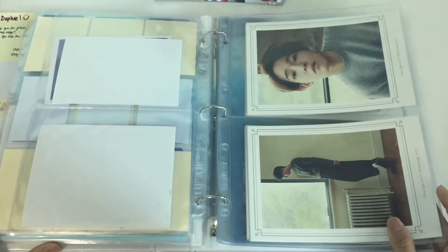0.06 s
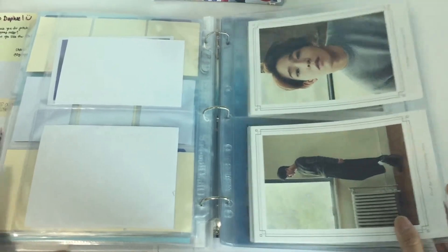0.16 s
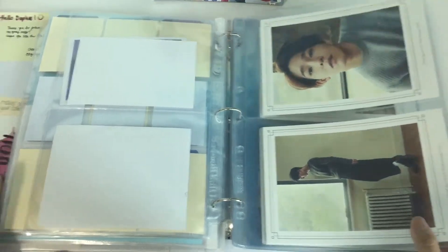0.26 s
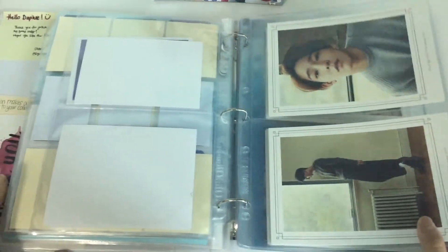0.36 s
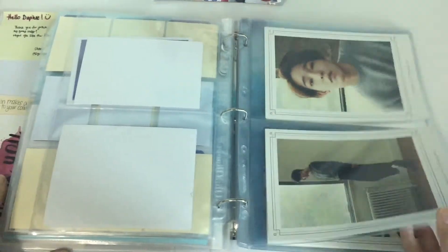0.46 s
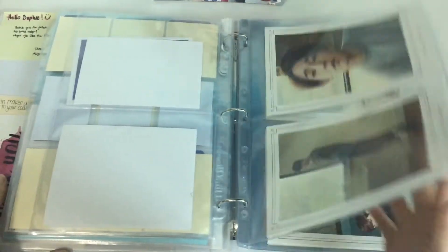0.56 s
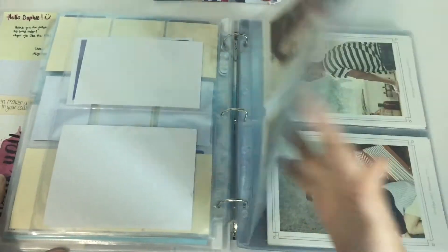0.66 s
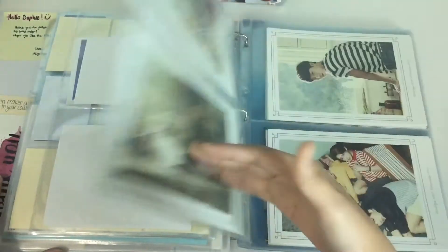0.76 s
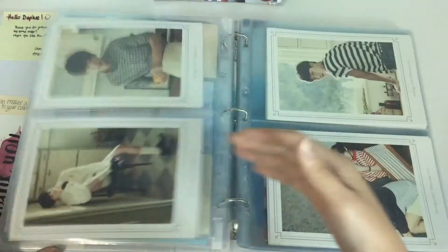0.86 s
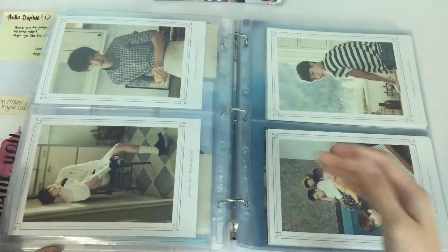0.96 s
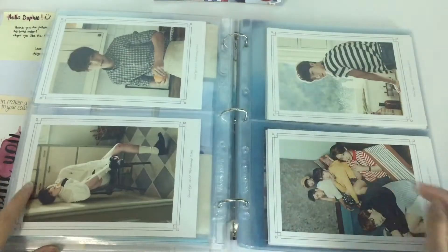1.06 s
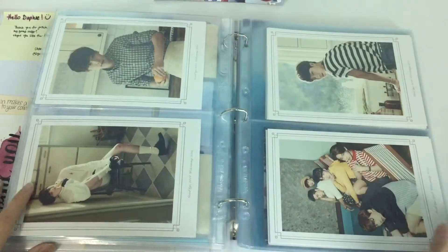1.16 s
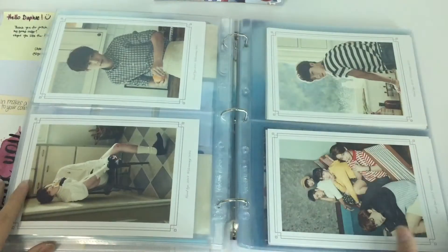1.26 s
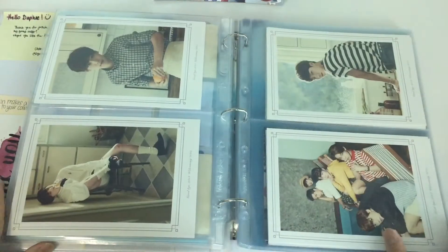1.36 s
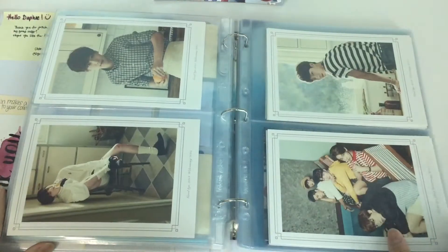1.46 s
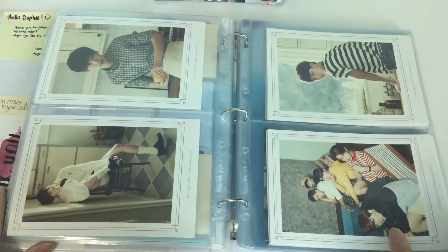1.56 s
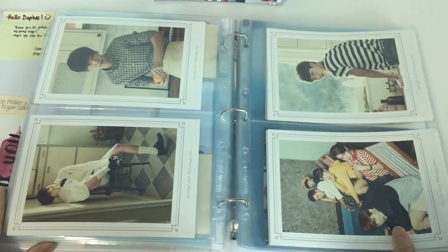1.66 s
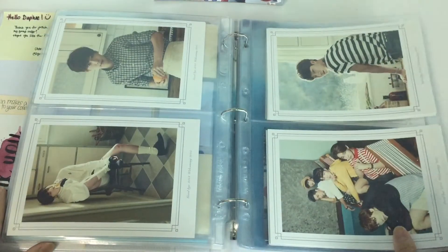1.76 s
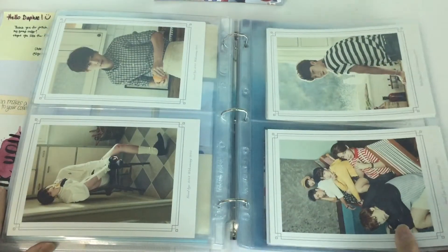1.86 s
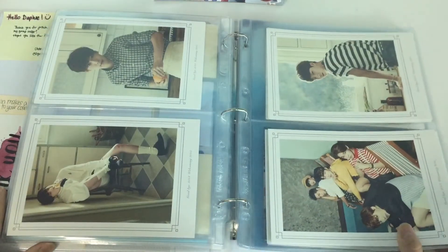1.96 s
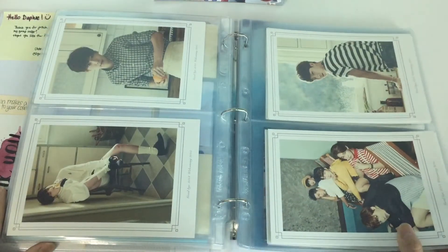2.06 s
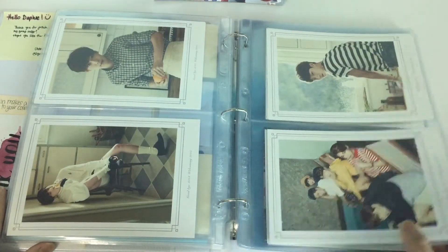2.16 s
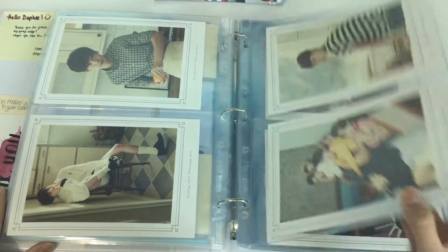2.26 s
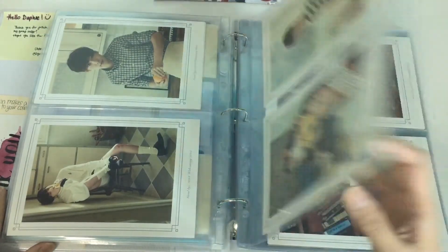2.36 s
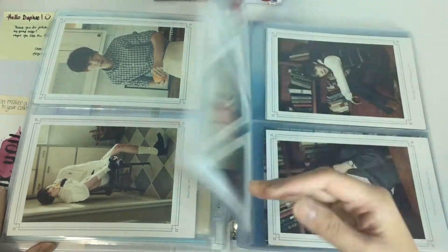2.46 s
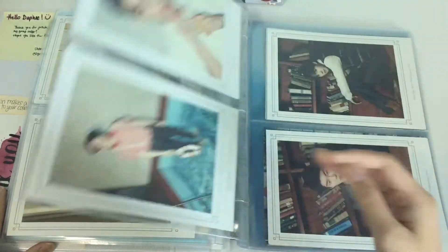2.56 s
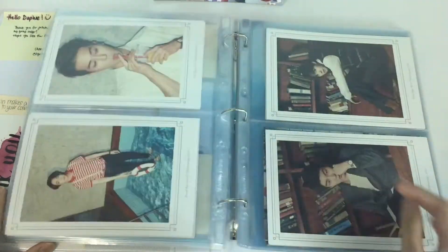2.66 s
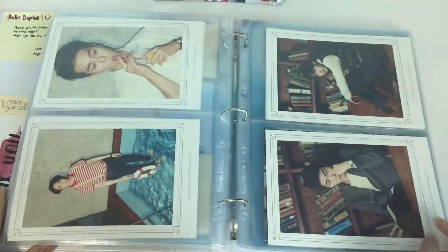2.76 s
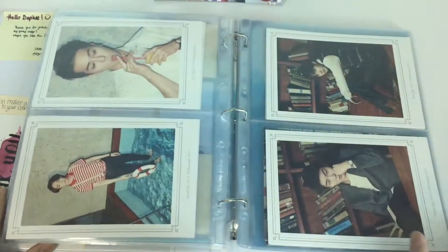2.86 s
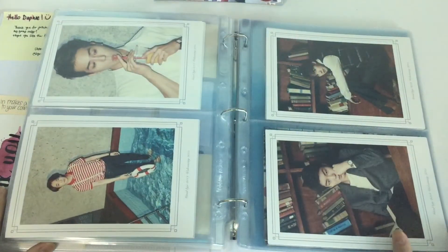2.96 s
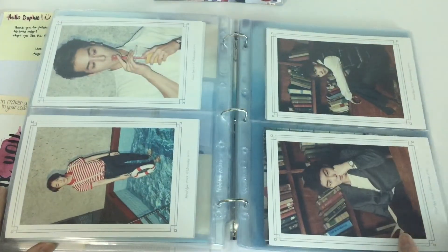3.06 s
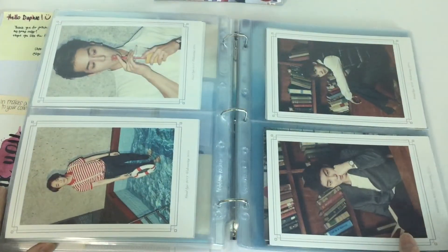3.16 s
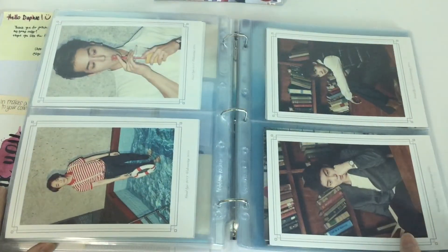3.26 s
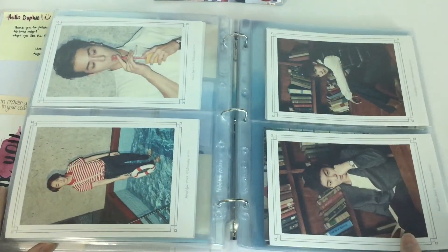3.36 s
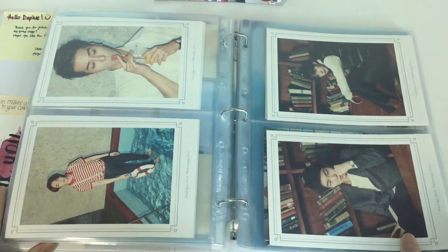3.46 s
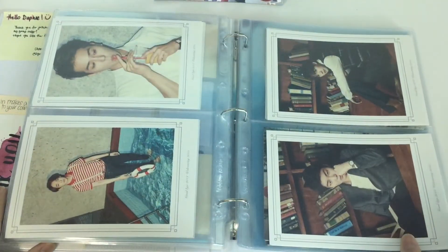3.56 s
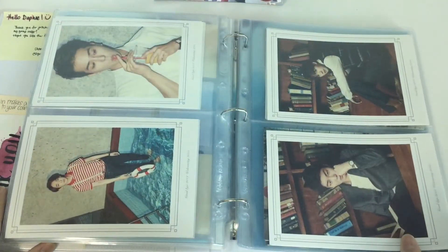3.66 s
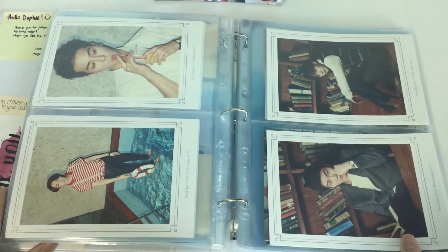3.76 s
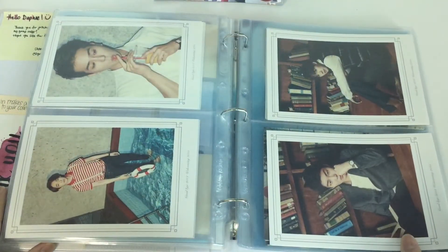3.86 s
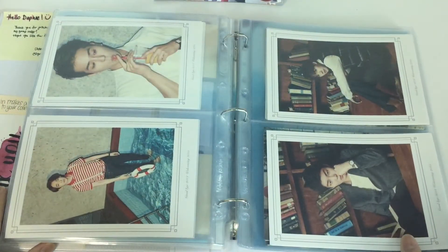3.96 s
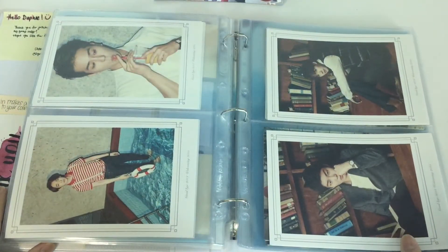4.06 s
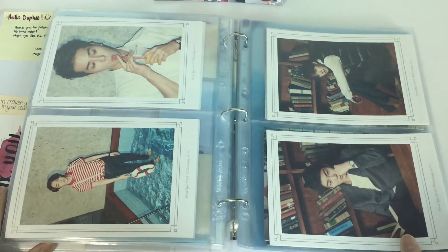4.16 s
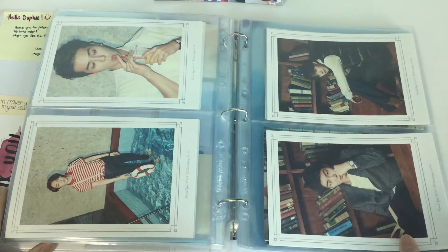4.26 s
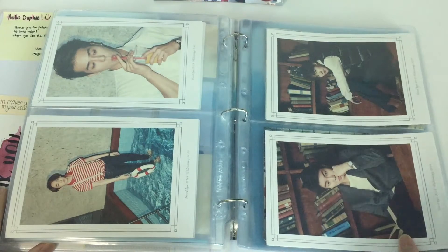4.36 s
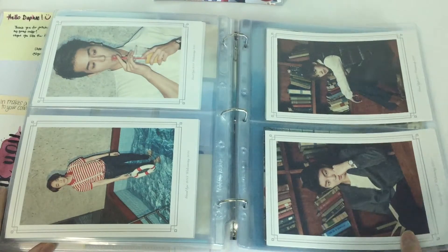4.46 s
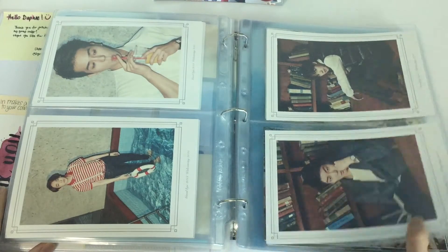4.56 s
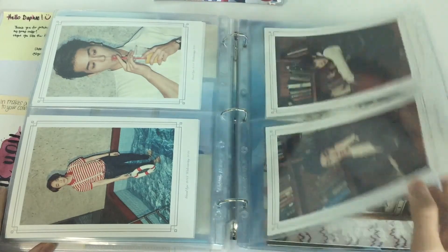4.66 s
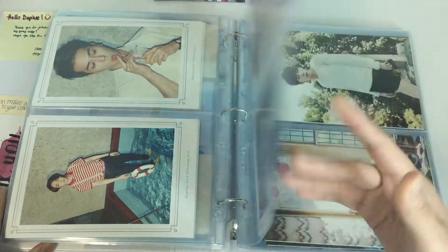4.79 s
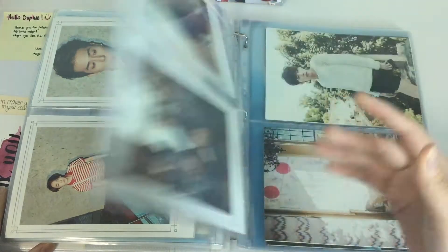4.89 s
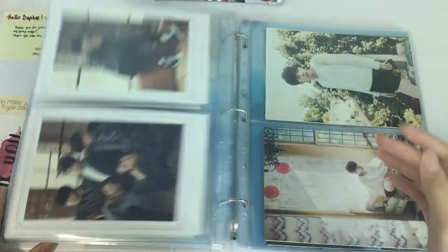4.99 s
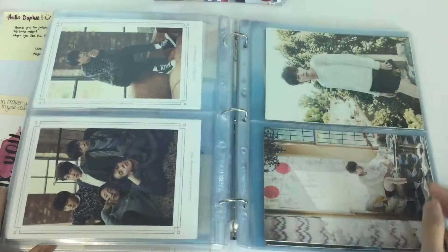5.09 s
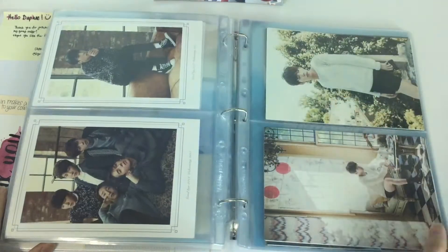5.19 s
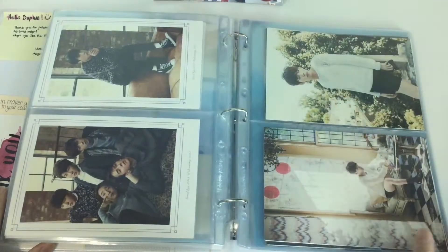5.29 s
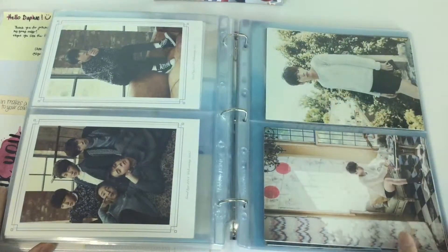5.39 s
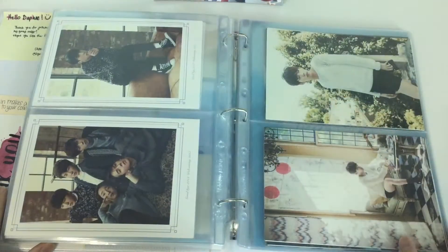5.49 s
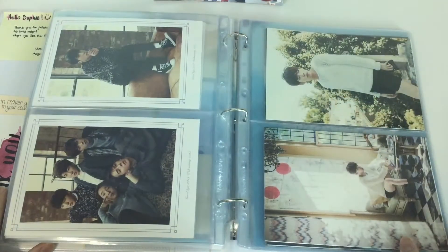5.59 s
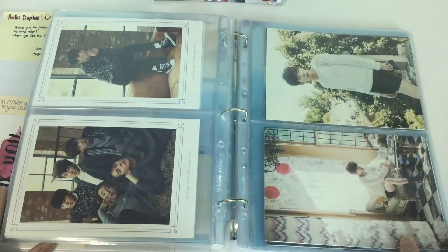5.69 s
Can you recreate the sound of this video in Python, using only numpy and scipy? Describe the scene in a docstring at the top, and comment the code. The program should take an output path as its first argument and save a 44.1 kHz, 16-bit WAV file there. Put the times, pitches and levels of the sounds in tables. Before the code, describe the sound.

Close, crinkly turns of plastic binder pages come in three short bursts, with soft thumps on the desk and quiet pauses between.

```python
"""Three stiff plastic sleeve pages are turned in a ring binder on a desk, close by, in a quiet room.
Each page slides off the one below, buckles, scuffs along the rings and slaps down. Snaps are sharp
cracks and scuffs are swarms of tiny slips, both coloured by the sheet's resonances and close echoes.
The binder and desk boom softly under the hand and the landing pages, over faint air and hum."""
import sys
import numpy as np
from scipy import signal
from scipy.fft import rfft, irfft
from scipy.io import wavfile

SR = 44100
rng = np.random.default_rng(int(sys.argv[2]) if len(sys.argv) > 2 else 0)


def put_to_file(sound):
    """Save the sound as 16-bit audio at rate SR, in the file named by the first command-line argument."""
    columns = np.atleast_2d(sound).T  # one column per channel
    safe = np.clip(columns, -1, 1)
    whole_steps = np.round(safe * 32767)
    wavfile.write(sys.argv[1], SR, whole_steps.astype(np.int16))


N = 252693


def amp(db):
    """Decibels to gain."""
    return 10 ** (np.asarray(db) / 20)


def unit(x):
    """Scale to rms 1."""
    return x / np.sqrt(np.mean(x ** 2) + 1e-20)


def read(points, hz):
    """Interpolate a table on a log-frequency axis."""
    points_hz, values = np.transpose(points)
    return np.interp(np.log(hz + 1), np.log(points_hz + 1), values)


def bells(rows, hz):
    """Sum of bell-shaped peaks or dips, in dB."""
    return sum(db / (1 + (2 * (hz - centre_hz) / width_hz) ** 2) for centre_hz, width_hz, db in rows)


def add(mix, start_s, sound):
    """Add a sound to the mix in place."""
    part = mix[max(round(start_s * SR), 0):][:len(sound)]
    part += sound[:len(part)]


def noise(shape):
    """Steady noise of rms 1 with magnitude spectrum shape(hz)."""
    return unit(irfft(rfft(rng.standard_normal(N)) * shape(np.fft.rfftfreq(N, 1 / SR)), N))


def band(centre_hz, width_hz):
    """Noise in one resonance, rms 1."""
    return noise(lambda hz: 1 / (1 + (2 * (hz - centre_hz) / width_hz) ** 2))


# Still room air. Each row: frequency in Hz, relative spectral density in dB.
AIR_SPECTRUM = [(15, -54), (25, -20), (48, -22), (69, 2.5), (96, -15), (129, 0.5), (246, -16.5), (322, -13),
                (349, -11.5), (378, -19.5), (782, -18.5), (997, -23), (1240, -23), (1620, -26),
                (15500, -40.5)]


def air(level_db=-61.5, hum_hz=316.8, hum_db=-77.5):
    """Faint room noise with a wavering hum."""
    hiss = noise(lambda hz: amp(read(AIR_SPECTRUM, hz)))
    return amp(level_db) * hiss + amp(hum_db) * band(hum_hz, width_hz=28)


# Hand resting and shifting on the binder. Each row: time in seconds, relative level in dB.
HAND_PRESSURE = [(0.0, -65.5), (0.14, -56.5), (0.38, -46), (0.52, -61), (1.21, -56), (1.47, -53.5),
                 (1.64, -51.5), (1.76, -52.5), (2.03, -70.5), (2.6, -59), (2.94, -57.5), (3.38, -79),
                 (4.02, -67.5), (4.6, -60), (4.82, -55), (4.98, -50), (5.33, -70), (5.73, -85)]


def hand(boom_hz=138, width_hz=24, gain_db=-2, steadiness=0.071):
    """The shifting hand keeps the binder's main mode murmuring; level follows pressure."""
    murmur = band(boom_hz, width_hz)
    murmur = unit(murmur / abs(signal.hilbert(murmur)) ** steadiness)
    times_s, levels_db = np.transpose(HAND_PRESSURE)
    return murmur * amp(gain_db + np.interp(np.arange(N) / SR, times_s, levels_db))


# Plastic sheet. Each row: frequency in Hz, relative spectral density in dB.
SHEET_SPECTRUM = [(40, -81), (120, -7.5), (230, 4.5), (380, -2.5), (500, 5), (660, -1.5), (800, -4.5),
                  (1100, -4.5), (1600, -2.5), (2400, 0), (3600, -4), (6000, -11.5), (10000, -16.5),
                  (16000, -12.5)]
# Sleeve resonances. Each row: centre in Hz, width in Hz, gain in dB.
SLEEVE_RESONANCES = [(773, 70, 7), (1067, 48, 4), (1490, 420, 6), (2200, 99, 1.5), (4620, 220, 3.5)]


def sheet_response(pitch_hz, focus_db, bass_db, treble_db, fizz_db, sharpness=4, size=2048):
    """Impulse response of the sheet; the bending patch lifts its own pitch by focus_db."""
    hz = abs(np.fft.fftfreq(size, 1 / SR)) + 1
    db = read(SHEET_SPECTRUM, hz) + bells(SLEEVE_RESONANCES, hz)
    db += bells([(514, 91, -11.5)], hz)  # the desk reflection cancels a narrow band
    db += focus_db / (1 + (sharpness * np.log2(hz / pitch_hz)) ** 2)
    db += bass_db * read([(400, 1), (1500, 0)], hz)
    db += treble_db * read([(1500, 0), (4000, 0.5), (9000, 1)], hz)
    db += fizz_db * read([(8000, 0), (14000, 1)], hz)  # top treble, reached only by hard edges
    minimum_phase = np.exp(np.conj(signal.hilbert(np.log(amp(db)))))
    response = np.fft.ifft(minimum_phase).real[:size // 2]
    return response / np.linalg.norm(response)


# Reflections off desk and cover. Each row: delay in seconds, linear gain.
DESK_ECHOES = [(.0012, .3), (.0028, 0.44), (.0049, .18), (.0083, .14)]


def echoed(x, delay_spread=0.35):
    """Add close echoes, their delays scattered as the page moves; scale to energy 1."""
    out = x.copy()
    for delay_s, gain in DESK_ECHOES:
        add(out, delay_s * np.exp(delay_spread * rng.uniform(-1, 1)), gain * x)
    return out / np.linalg.norm(out)


def scuff(peak_s, db, swell_s, fade_s, response, slips_per_s=7000, spread_db=0.5, size=16384):
    """One friction stroke: tiny uneven slips swell and fade, driving the sheet's response."""
    out, t = np.zeros(N), (np.arange(size) - size // 2) / SR
    heights = amp(spread_db * np.minimum(rng.exponential(1, size), 4))
    heights *= rng.choice([-1, 1], size)
    slips = unit(heights * (rng.random(size) < slips_per_s / SR))
    envelope = np.exp(-abs(t / np.where(t < 0, swell_s, fade_s)) ** 1.79)
    add(out, peak_s + t[0], amp(db) * signal.fftconvolve(slips * envelope, echoed(response)))
    return out


# Sleeve sliding over its neighbour. Each row: peak time in seconds, level in dB, swell in seconds,
# pitch in Hz, bass in dB, treble in dB.
PAGE_SLIDES = [ (.318, -44.5, 0.07, 2390, -5, 3.5), (0.496, -61.5, 0.064, 2100, -2, 0),
               (0.614, -65, 0.025, 1985, 3, 0), (.745, -52, 0.032, 1120, 10.5, -20),
               (0.807, -44.5, 0.058, 1420, 8.5, -0.5), (.937, -43.5, 0.031, 1730, 0.5, -1),
               (1.535, -66.5, 0.026, 1900, 1, 15), (2.055, -67, .012, 1700, 2, -4),
               (2.238, -53.5, 0.018, 2090, -11, -2), (2.384, -49, 0.024, 1510, 6, 13.5),
               (2.445, -48, .04, 2170, 11, 2), (2.557, -55, 0.021, 2330, -10, -7),
               (2.662, -47, 0.016, 1330, -3, -9), (2.714, -43.5, 0.03, 1320, 4, -0.5),
               (2.836, -63.5, .022, 2000, 2, 3), (4.833, -42.5, 0.042, 1110, 5, -9),
               (4.911, -49, 0.031, 1600, 4, 0.5), (5.012, -56.5, 0.028, 1380, -5, -6),
               (5.083, -50, 0.029, 1840, -3, -3), (5.269, -65, .02, 5030, -10, 11)]


def slides(focus_db=4, brisk_s=0.02, fade_ratio=0.94):
    """Slow arches of friction; the brisker the slide, the more top treble."""
    out = np.zeros(N)
    for peak_s, db, swell_s, pitch_hz, bass_db, treble_db in PAGE_SLIDES:
        fizz_db = -6 - 2 * np.log2(swell_s / brisk_s)
        response = sheet_response(pitch_hz, focus_db, bass_db, treble_db, fizz_db)
        out += scuff(peak_s, db, swell_s, swell_s * fade_ratio, response)
    return out


def creases(per_slide=3, offset_db=-13, spread_db=7.5, spread_octaves=0.66):
    """Small creases give way in each slide: rows of faint snaps in that slide's colour."""
    rows = []
    for peak_s, slide_db, swell_s, pitch_hz, bass_db, treble_db in PAGE_SLIDES:
        for timing, force, detune in rng.standard_normal((per_slide, 3)):
            start_s = peak_s + 0.5 * swell_s * timing
            db = slide_db + offset_db + spread_db * force
            rows.append((start_s, db, pitch_hz * 2 ** (spread_octaves * detune), bass_db, treble_db))
    return rows


# Sheet buckling or striking. Each row: start in seconds, level in dB, pitch of the bending patch in Hz,
# bass in dB, treble in dB.
PAGE_SNAPS = [ (0.219, -53, 2090, 19, 17), (0.4828, -37.5, 2920, -4, -6), (.491, -36, 1660, -7, 0.5),
              (0.527, -47, 790, 8, -29), (.721, -34.5, 1160, 6.5, -11), (.7767, -30.5, 11000, -2.5, 9.5),
              (0.7907, -33.5, 4100, 12.5, 21), (.806, -31.5, 1400, -5, 0), (0.8102, -35, 1410, 5, 0),
              (0.9127, -30.5, 2020, -13, -5), (0.9585, -46, 1770, -8, 10), (1.268, -56.5, 2060, -13, 3),
              (1.398, -56, 1660, 6, -30), (2.292, -64.5, 9000, -10, 12), (2.3794, -42, 1570, 10, 1),
              (2.4065, -39, 1520, 11, 5), (2.4467, -47, 4000, -9, 16), (2.4617, -40.5, 2120, 6, 1),
              (2.5364, -34.5, 2240, 6.5, -17), (2.690, -37.5, 1540, 6, -8), (2.6997, -41, 1360, -11, -10),
              (2.716, -32, 1300, -5.5, 0.5), (2.8374, -54, 1440, 1, 0), (4.7015, -47.5, 2200, 2, -20),
              (4.7993, -21, 970, 1.5, -11), (4.894, -31.5, 1560, 9, -16), (5.0077, -39.5, 1800, -14, -15.5),
              (5.0487, -36, 3030, -12, -8), (5.0731, -37, 1740, -23, 3.5)]


def snaps(ring_db=3.5, t60_s=0.021, focus_db=9.5, level_window_s=0.005, size=4096):
    """A sharp crack, then bending waves that run about the sheet and die fast."""
    out, t = np.zeros(N), np.arange(size) / SR
    for start_s, db, pitch_hz, bass_db, treble_db in PAGE_SNAPS + creases():
        drive = rng.standard_normal(size) * amp(-60 * t / t60_s)
        drive *= amp(ring_db) / np.linalg.norm(drive)
        drive[0] = 1  # the crack
        fizz_db = -7.5 - 0.5 * np.log2(pitch_hz / 2300)
        response = sheet_response(pitch_hz, focus_db, bass_db, treble_db, fizz_db)
        snap = echoed(signal.fftconvolve(drive, response))
        add(out, start_s, amp(db) * np.sqrt(level_window_s * SR) * snap)
    return out


# Modes of the binder on the desk. Each row: frequency in Hz, relative level in dB, T60 in seconds.
BINDER_MODES = [(116, -40, 0.34), (143, 2, 0.24), (207, 2, 0.068), (348.6, 3, 0.17), (395, 5, 0.15),
                (815, 8, 0.071), (1030, -7, 0.038), (1150, -2, 0.18)]
# Pushes on the binder. Each row: start in seconds, gain in dB, length in seconds,
# mode frequency ratio set by the hand's grip.
BINDER_PUSHES = [(.261, -34.5, 0.0046, 1.01), (0.338, -33.5, 0.0047, 0.94), (0.436, -27, 0.0075, 0.99),
                 (.720, -49, 0.0021, 1.37), (0.812, -35, 0.0042, 1), (0.939, -41.5, 0.0041, 1.03),
                 (2.376, -40, 0.0067, 0.95), (2.429, -44, 0.0046, 1.42), (2.721, -33.5, 0.006, .96),
                 (3.655, -48.5, 0.007, 1), (3.81, -51, 0.0069, 1.04), (4.315, -47, 0.0057, 1.08),
                 (4.799, -37, .00038, 1.024), (4.896, -31, 0.0063, .97), (5.084, -45, 0.0048, 1.11)]


def thumps(highpass_hz=105):
    """Each push rings the binder; a short one reaches its higher modes too."""
    out, t = np.zeros(N), np.arange(SR // 2) / SR
    for start_s, db, length_s, ratio in BINDER_PUSHES:
        ring = sum(amp(mode_db - 60 * t / t60_s) * np.sin(2 * np.pi * hz * ratio * t)
                   for hz, mode_db, t60_s in BINDER_MODES)
        push = np.sin(np.pi * np.minimum(t / length_s, 1)) ** 2
        add(out, start_s, amp(db) * signal.fftconvolve(push / push.sum(), ring))
    # the binder is too small to radiate deep bass
    return signal.sosfilt(signal.butter(3, highpass_hz, "highpass", fs=SR, output="sos"), out)


# Sleeve catching. Each row: peak time in seconds, level in dB, bass in dB, treble in dB, fizz in dB.
PAGE_CRINKLES = [(0.269, -45.5, 3, 28, -15), (.350, -38, 24, 25.5, -15), (.781, -37, -7, 22, -7),
                 (.936, -33.5, 4.5, 10.5, -20), (2.243, -56, -23, 13, -3), (2.422, -39.5, -4, 14, -6),
                 (2.533, -41.5, 18, 18, -10), (4.714, -51.5, 23.5, 22, -18), (4.776, -40.5, -11, 21, -6.5),
                 (4.8889, -34.5, 9, 14.5, -11), (5.081, -40.5, -5, 2.5, -7)]


def crinkles(pitch_hz=3900, focus_db=4, swell_s=0.004, fade_s=0.0077):
    """The sleeve catches for an instant: short, bright bursts of friction."""
    out = np.zeros(N)
    for peak_s, db, bass_db, treble_db, fizz_db in PAGE_CRINKLES:
        response = sheet_response(pitch_hz, focus_db, bass_db, treble_db, fizz_db)
        out += scuff(peak_s, db, swell_s, fade_s, response)
    return out


# Room decay. Each row: frequency in Hz, T60 in seconds.
ROOM_T60 = [(150, 0.48), (1000, 0.22), (4000, 0.18), (16000, 0.23)]


def room(x, wet_db=-14, build_s=0.0064, size=256):
    """Add a short diffuse tail whose bass lasts longest."""
    hz, t, spectra = signal.stft(rng.standard_normal(SR // 2), SR, nperseg=size)
    decay = amp(-60 * t / read(ROOM_T60, hz)[:, None])
    tail = signal.istft(spectra * decay, SR, nperseg=size)[1]
    tail *= 1 - np.exp(-(np.arange(len(tail)) / SR / build_s) ** 2)
    return x + amp(wet_db) * signal.fftconvolve(x, tail / np.linalg.norm(tail))[:N]


def scene():
    """Pages in their room, over the binder's boom and the still air; mono."""
    pages = snaps() + slides() + crinkles()
    return (room(pages) + thumps() + hand() + air())[None]


# Shallow dips in the microphone's response. Each row: centre in Hz, width in Hz, gain in dB.
MICROPHONE_DIPS = [(6050, 370, -2.5), (13250, 1100, -4.5)]


def record(dry, cutoff_hz=15950):
    """Microphone colour, then a steep low-pass."""
    response = amp(bells(MICROPHONE_DIPS, np.fft.rfftfreq(N, 1 / SR)))
    coloured = irfft(rfft(dry) * response, N)
    lowpass = signal.firwin(511, cutoff_hz, window=("kaiser", 8), fs=SR)
    return signal.oaconvolve(coloured, lowpass[None], "same")


dry = scene()
out = record(dry)
put_to_file(out)
```